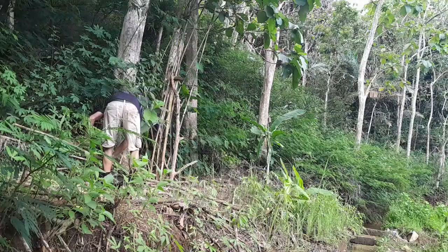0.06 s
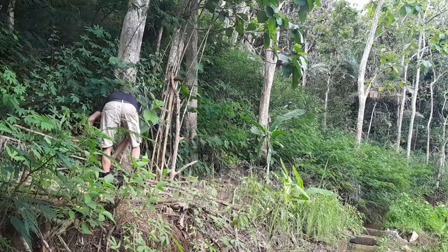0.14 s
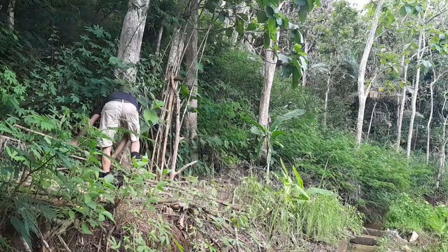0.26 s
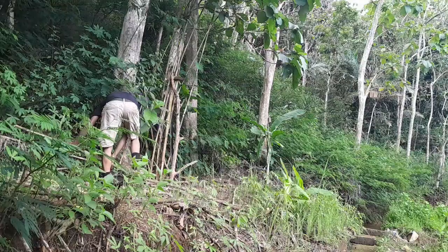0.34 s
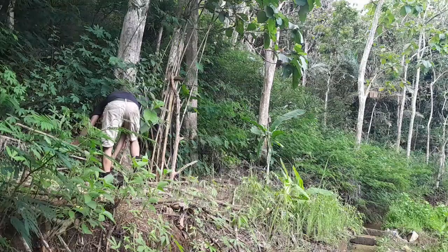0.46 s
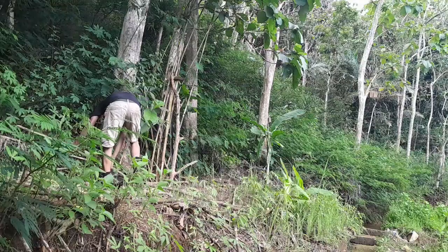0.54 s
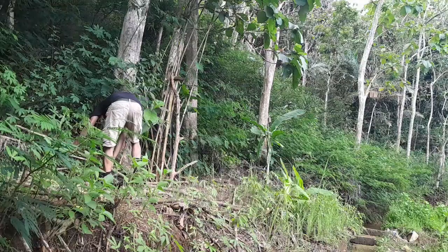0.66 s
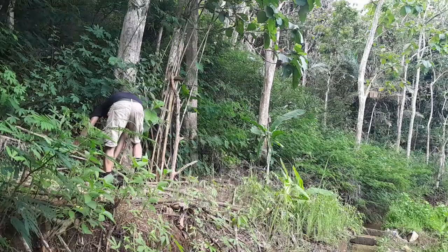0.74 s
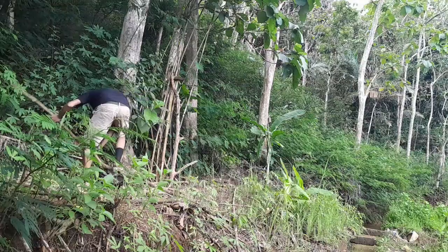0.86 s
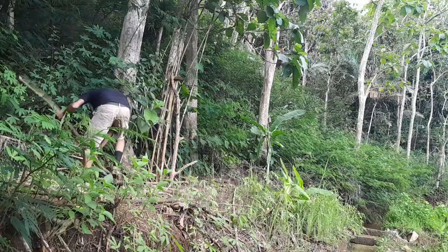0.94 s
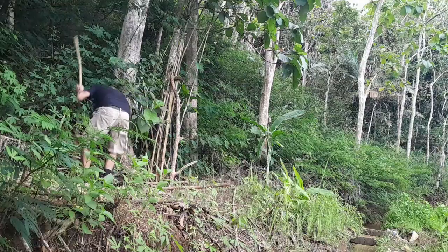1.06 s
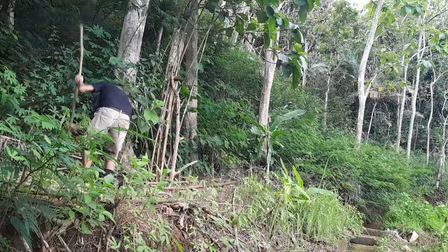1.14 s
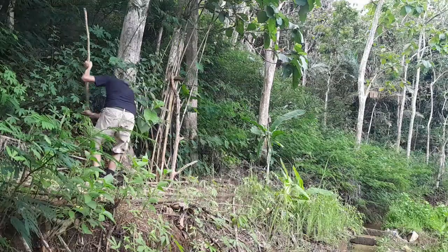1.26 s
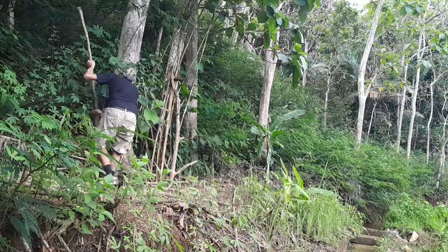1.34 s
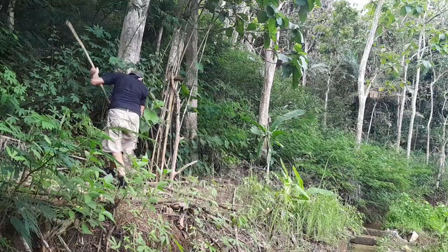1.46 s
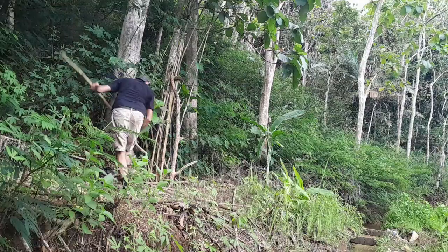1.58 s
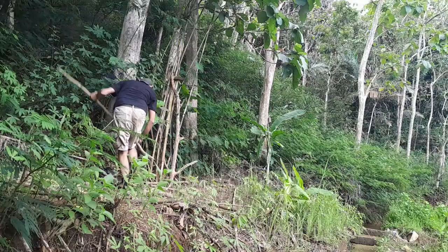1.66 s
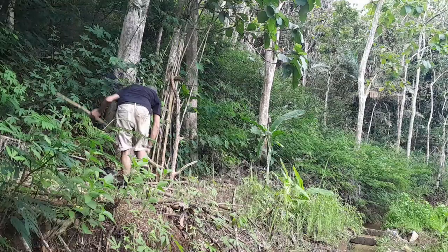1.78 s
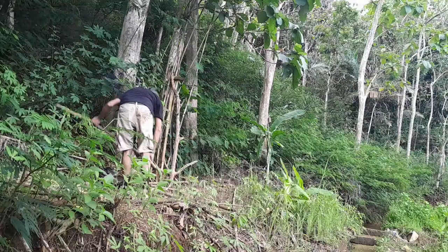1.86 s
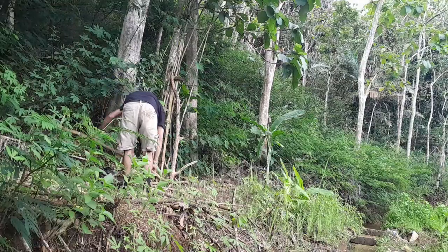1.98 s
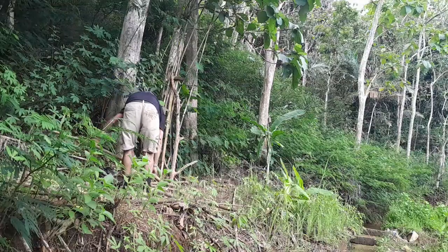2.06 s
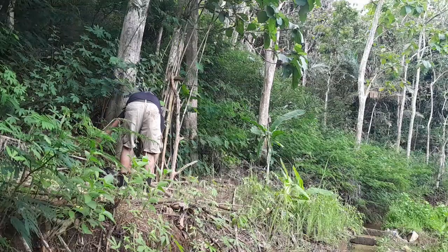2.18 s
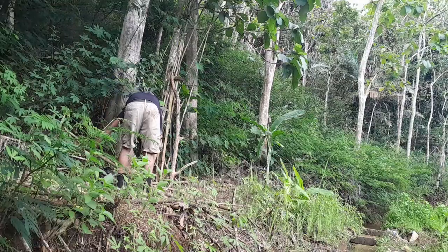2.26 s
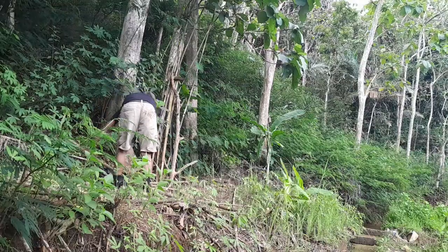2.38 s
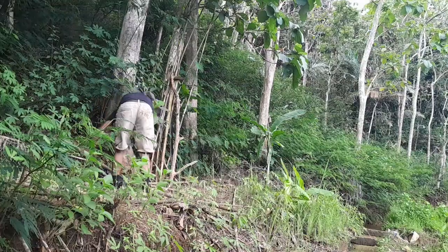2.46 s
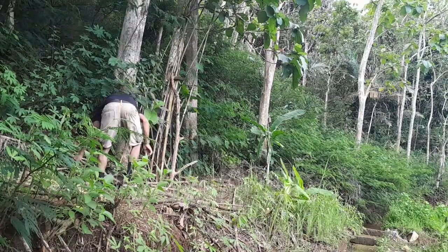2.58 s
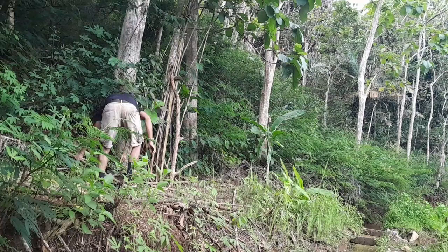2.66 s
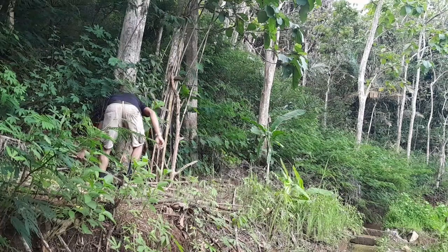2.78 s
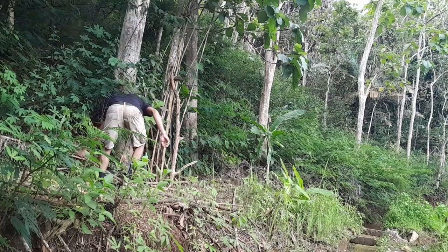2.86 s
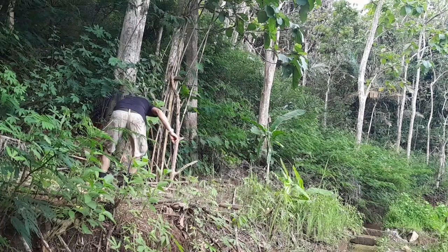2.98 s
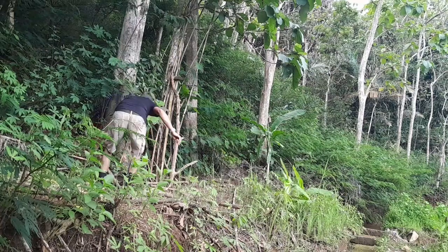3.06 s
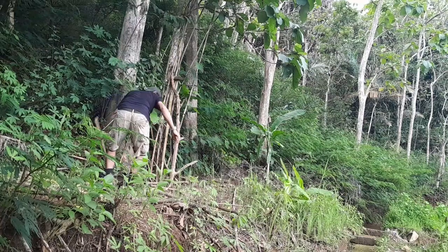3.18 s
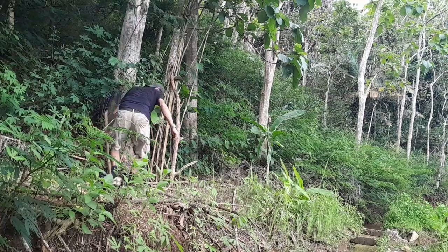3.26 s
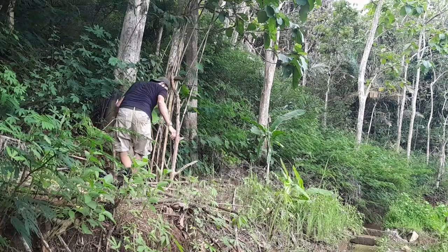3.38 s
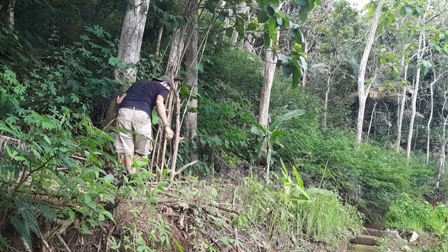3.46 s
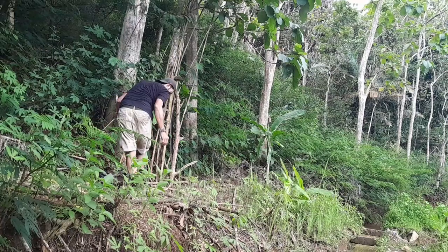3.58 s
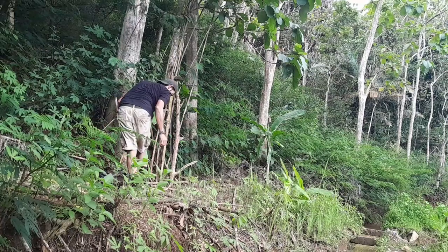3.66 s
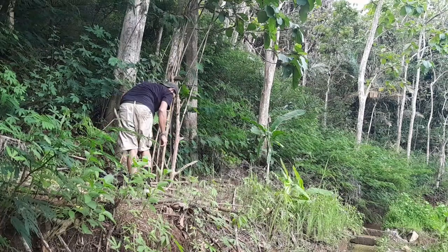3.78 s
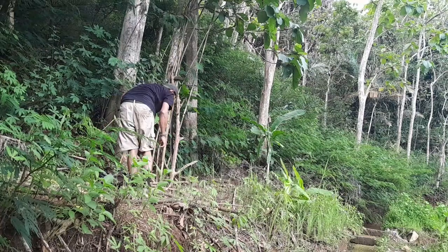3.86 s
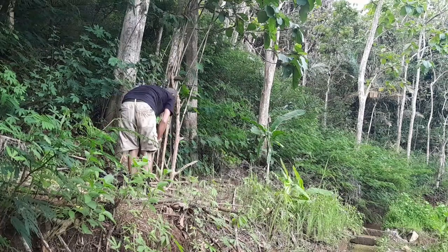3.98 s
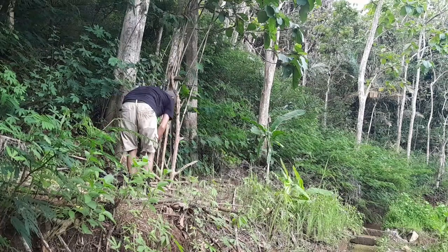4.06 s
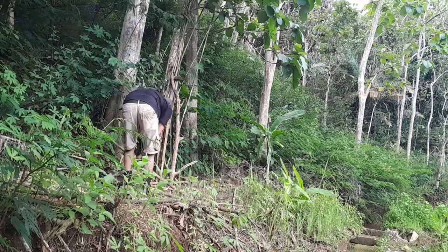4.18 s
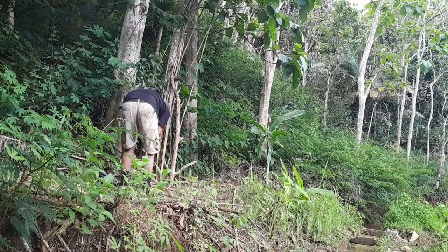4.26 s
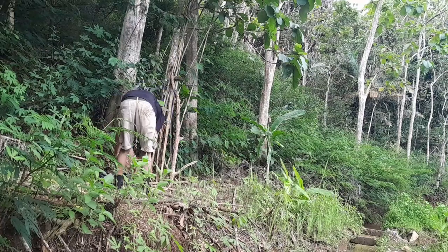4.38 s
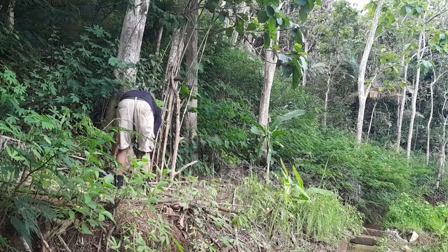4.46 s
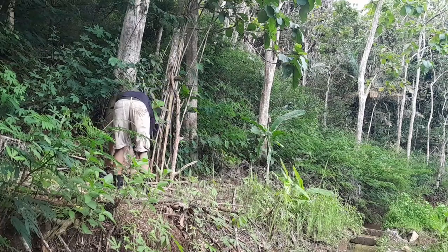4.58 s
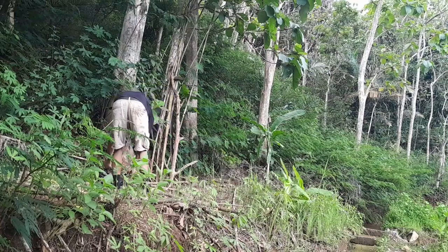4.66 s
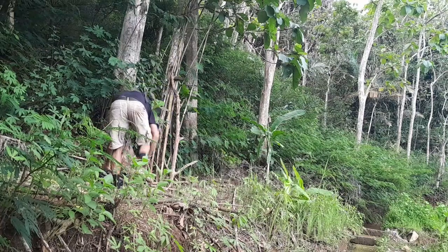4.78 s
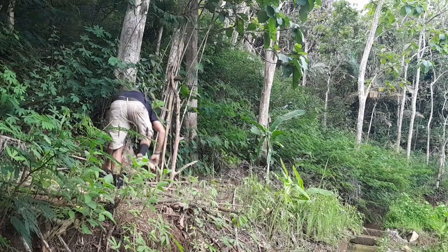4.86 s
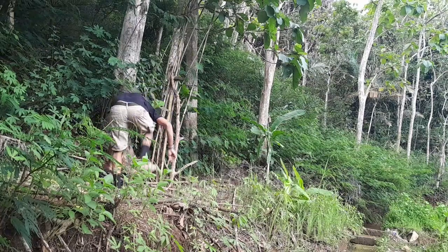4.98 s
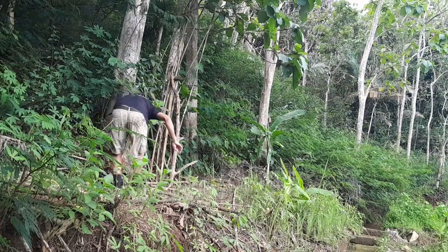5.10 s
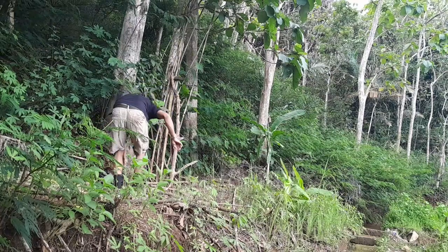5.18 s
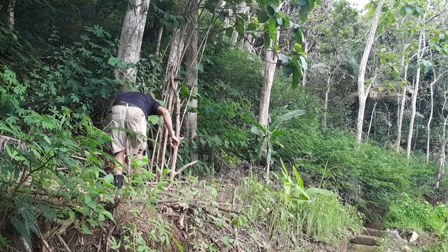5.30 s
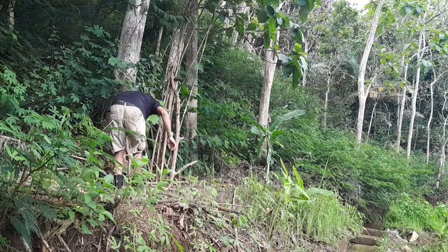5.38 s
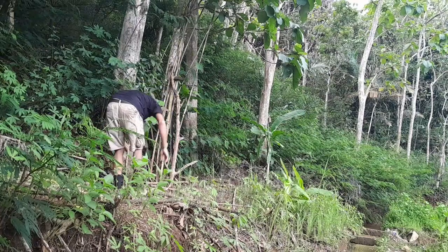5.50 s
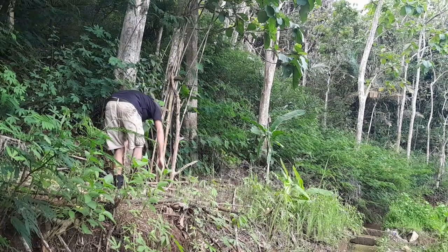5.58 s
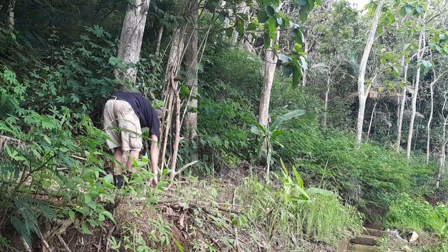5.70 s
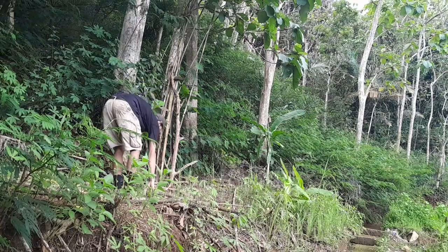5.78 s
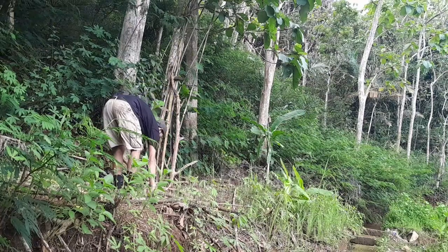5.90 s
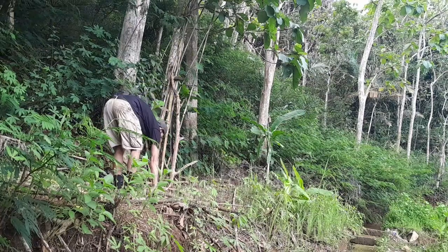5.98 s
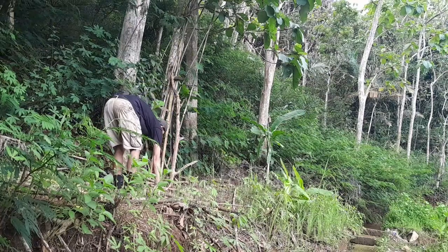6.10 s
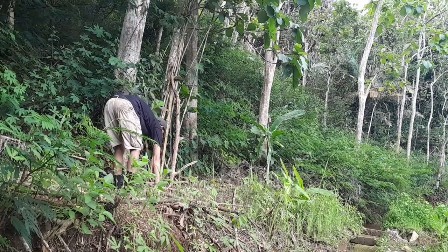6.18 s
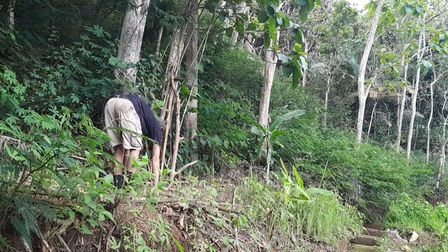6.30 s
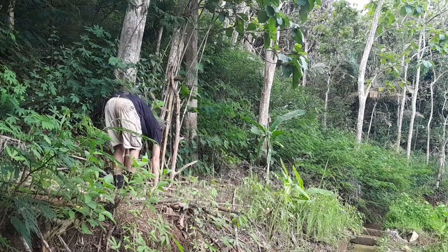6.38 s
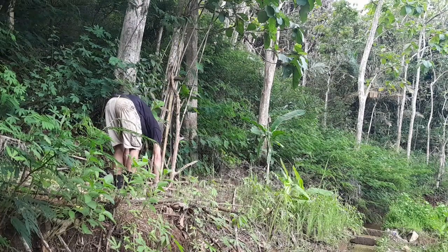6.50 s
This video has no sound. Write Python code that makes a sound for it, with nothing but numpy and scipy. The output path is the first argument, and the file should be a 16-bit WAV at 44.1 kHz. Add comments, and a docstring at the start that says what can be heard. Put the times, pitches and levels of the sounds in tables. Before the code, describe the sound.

Against a faint forest hiss and a low rumble of breeze on the microphone, a dry branch breaks with a sharp crack a few metres away. Two more follow at even intervals, each with a soft thud and a quick wash of echo. Small wooden knocks and a leaf scuff fill the gaps. A very faint insect and a distant whistling bird are heard early on.

```python
"""Snapping dry branches

Three branches are snapped by hand on a wooded slope, a few metres away. Each gives way in two
quick breaks; trunks and leaves scatter the crack into a bright, fading wash. Sticks knock, two
branches crack just before they snap, and dry leaves scuff once. An insect chirps, a far bird
whistles and a light breeze rumbles on the microphone."""
import sys
import numpy as np
from scipy import signal
from scipy.fft import rfft, irfft, next_fast_len
from scipy.io import wavfile

SR = 44100
rng = np.random.default_rng(int(sys.argv[2]) if len(sys.argv) > 2 else 0)


def wrap_up_sound(samples):
    """Save the sound to the file named by the first command line argument, as 16-bit audio."""
    columns = np.atleast_2d(samples).T
    # keep every value between -1 and 1, then stretch to whole-number steps
    tamed = np.clip(columns, -1, 1)
    steps = np.round(tamed * 32767).astype(np.int16)
    wavfile.write(sys.argv[1], SR, steps)


N = 288320

# rumble spectrum of ground and breeze: f/Hz, level/dB
RUMBLE_SPECTRUM = [(15, -33), (25, -44.5), (43, -5), (65, -2), (93, -5), (141, -2), (239, -6.5),
                   (316, -10.5), (406, -14), (700, -18.5), (910, -39), (1540, -120)]


def snaps(thud_t60_s=0.14, rumble_re_thud_db=-18.5, rumble_t60_s=0.7):
    """Per branch: two breaks, stub knock, ground thud and rumble, forest echo, ringing piece."""
    # t/s, first break/dB, delay to second/s, second break/dB, splinters/Hz, thud/dB,
    # stub/Hz, stub/dB, echo/dB, echo low edge/Hz, echo treble/dB, ring/dB
    branches = [(0.9572, 3, 0.0012, -3, 5600, -24, 1174, -20, -19, 1170, -3.5, -33),
                (2.9795, 4, 0.001583, 3.5, 4220, -25.5, 1136, -15, -17.5, 1910, -2, -48),
                (5.0936, 2, 0.00214, -3.5, 3260, -21.5, 1440, -16, -20, 2850, 0, -55)]
    # ground thud: f/Hz, level/dB
    thud_spectrum = [(30, -23), (80, -2), (170, 3.5), (260, -4), (550, -1), (1200, -1), (2500, -16.5),
                     (6000, -18), (16000, -22)]
    out, t = np.zeros((2, N)), np.arange(SR) / SR
    for (s, first_db, delay_s, second_db, splinter_hz, thud_db,
         stub_hz, stub_db, echo_db, low_hz, treble_db, ring_db) in branches:
        add(out, s, from_db(first_db) * fracture(splinter_hz))
        add(out, s + delay_s, from_db(second_db) * fracture(splinter_hz))
        add(out, s + delay_s, from_db(stub_db) * stub_knock(stub_hz))
        add(out, s, diffuse(thud_spectrum, SR) * decay(t, thud_t60_s, thud_db))
        add(out, s, diffuse(RUMBLE_SPECTRUM, SR) * decay(t, rumble_t60_s, thud_db + rumble_re_thud_db))
        add(out, s, from_db(echo_db) * forest_echo(low_hz, treble_db))
        add(out, s, from_db(ring_db) * stick_ring())
    return out


def fracture(splinter_hz, pulse_db=6.5, travel_1khz_s=0.00065, half_width_oct=0.43):
    """One break: a pressure pulse, brief splintering and the last fibres tearing."""
    # breaking wood: f/Hz, level/dB
    crack_spectrum = [(30, -25), (80, -14), (170, 6), (350, -12), (1200, -1), (3000, 2), (5000, 1),
                      (7000, -10), (9800, -13), (12500, -1.5), (16000, -11)]
    size = SR // 8
    t = np.arange(size) / SR
    khz = np.arange(size // 2 + 1) * SR / size / 1000
    # bending waves travel faster the higher they are
    bending = irfft(np.exp(-4j * np.pi * travel_1khz_s * 1e3 * np.sqrt(khz)), size)
    pulse = from_db(pulse_db) * colour(bending, crack_spectrum)
    splinters = rms_one(colour(rng.standard_normal(size), resonance(splinter_hz, half_width_oct)))
    splinters *= decay(t, t60_s=0.012, db=-10)
    tearing = diffuse(crack_spectrum, size) * decay(t, t60_s=0.02, db=-18)
    return from_branch(pulse + splinters) + tearing


def stub_knock(hz, t60_s=0.017, overtone_db=-7):
    """The hand-held stub knocks in its first two bending modes, quickly damped."""
    t = np.arange(SR // 8) / SR
    first = np.sin(2 * np.pi * hz * t) * decay(t, t60_s)
    second = np.sin(2 * np.pi * 2.76 * hz * t) * decay(t, t60_s / 2, overtone_db)
    return from_branch(first + second)


def forest_echo(low_hz, treble_db, build_s=0.0078, shelf_db=-8, grain_db=1.0, grain_s=0.0033):
    """Scatter from trunks and leaves builds as the crack spreads, then dies, treble first."""
    # scattered crack: f/Hz, level/dB
    echo_spectrum = [(100, -11), (500, -4.5), (1000, -1.5), (1700, -1.5), (2700, -0.5), (3600, 1),
                     (5000, 0), (7000, -3.5), (8300, -7), (9800, -14.5), (11500, -5), (14000, -9),
                     (16000, -20)]
    # forest decay: f/Hz, t60/s
    forest_t60 = [(100, 0.76), (700, 0.65), (2000, 0.57), (4000, 0.52), (8000, 0.49), (16000, 0.39)]
    t, hz = np.arange(SR) / SR, np.arange(SR // 2 + 1)
    centres_hz = np.geomspace(250, 16000, 5)
    # a thinner branch radiates a higher range
    girth = [(low_hz * 0.6, shelf_db), (low_hz, 0), (low_hz * 4, 0), (low_hz * 10, treble_db)]
    wash = rfft(diffuse(echo_spectrum, SR)) * from_db(at_hz(girth, hz))
    out = 0
    for centre_hz, share in zip(centres_hz, np.eye(len(centres_hz))):
        band = irfft(wash * at_hz(np.column_stack([centres_hz, share]), hz), SR)
        out += band * decay(t, at_hz(forest_t60, centre_hz))
    trunks = wander(t, grain_s, rng.standard_normal(SR))  # some reflections stand out
    return out * (1 - np.exp(-t / build_s)) * from_db(grain_db * trunks)


def stick_ring(build_s=0.0061, flutter_s=0.037, flutter_depth=0.23):
    """Bending modes of the freed piece flutter as their paths through the trees mix."""
    # f/Hz, level/dB, t60/s
    modes = [(759, -9, .2), (1082, -2, .6), (1335, -5, .42), (1722, 0, .47), (1851, -6, .35),
             (2114, -7, .35), (2410, -5, .42), (2745, -4, .35)]
    out, t = 0, np.arange(SR) / SR
    for hz, db, t60_s in modes:
        paths = rng.standard_normal((2, 200)) + 1j * rng.standard_normal((2, 200))
        flutter = np.array([wander(t, flutter_s, port) for port in paths])
        tone = np.exp(2j * np.pi * (hz * t + rng.random())) * (1 + flutter_depth * flutter)
        out += tone.real * decay(t, t60_s, db)
    return out * (1 - np.exp(-t / build_s))


def knocks_cracks_scuff(tick_ratio=3.1, overtone_db=-17, soil_ratio=0.45, soil_lag_s=0.0027):
    """Sticks knock with a brief high tick of bark and leaves, two branches crack just before they snap, and dry
    leaves scuff once."""
    # t/s, level/dB, f/Hz, half-width/oct, t60/s; cracks at 0.953 and 5.0667 s, scuff at 5.738 s
    events = [(0.674, -44, 3026, 0.38, .03), (0.953, -28, 5200, 1.0, 0.0063),
              (1.4242, -24.5, 1040, 0.55, 0.032), (1.605, -42, 760, 0.41, .02),
              (1.802, -33.5, 1490, 0.33, 0.023), (3.239, -40.5, 600, 0.51, 0.061),
              (3.443, -46, 800, .6, .09), (4.757, -47, 1980, 0.22, .08), (5.0667, -20.5, 674, 1.12, 0.0093),
              (5.738, -46, 3000, 1.7, 0.12), (6.275, -41.5, 770, 0.69, 0.035),
              (6.388, -34.5, 1290, 1.1, 0.021)]
    out = np.zeros((2, N))
    for s, db, hz, half_width_oct, t60_s in events:
        soil_db = db + 1.05 * (db + 18.5)  # hard ones also thud in the soil
        add(out, s, from_db(db) * contact(hz, half_width_oct, t60_s))
        add(out, s, from_db(db + overtone_db) * contact(hz * tick_ratio, half_width_oct, t60_s=0.13))
        add(out, s + soil_lag_s, from_db(soil_db) * contact(hz * soil_ratio, half_width_oct, t60_s=0.096))
    return out


def contact(hz, half_width_oct, t60_s, tap_db=-5, rattle_db=-8, echo_db=-23, echo_t60_s=0.41):
    """A tap and a short rattle excite a damped resonance and leave a faint echo."""
    t = np.arange(SR // 4) / SR
    impulse = 1.0 * (t == 0)
    response = colour(impulse, resonance(hz, half_width_oct))
    envelope = decay(t, t60_s, rattle_db) + decay(t, echo_t60_s, echo_db)
    rattle = envelope * diffuse([(hz, 0)], len(t))  # flat spectrum
    body = signal.fftconvolve(rattle, response[None] / np.linalg.norm(response), axes=1)
    tap = from_db(tap_db) * from_branch(response / np.abs(response).max())
    return body[:, :len(t)] + tap


def bird(note_s=0.094, fall_hz_per_s=3070, waver_hz=50, waver_s=0.0027, echo_t60_s=0.81, wet=0.92):
    """Far, falling, slightly hoarse whistles, smeared by the trees."""
    # t/s, start f/Hz, level/dB
    notes = [(0.87, 2700, -66), (1.298, 2510, -55.5), (2.355, 2685, -60.5), (2.515, 2510, -60.5),
             (2.70, 2510, -56.5), (2.875, 2490, -58.5)]
    out, t = np.zeros((2, N)), np.arange(SR // 2) / SR
    for s, start_hz, db in notes:
        waver = wander(t, waver_s, rng.standard_normal(len(t)))
        hz = (start_hz - fall_hz_per_s * t + waver_hz * waver)[t < note_s]
        whistle = np.sin(2 * np.pi * np.cumsum(hz) / SR)
        note = from_db(db) * rms_one(whistle * np.hanning(len(hz)))
        trees = rng.standard_normal((2, len(t))) * decay(t, echo_t60_s)
        add(out, s, note / 2)
        add(out, s, wet * signal.fftconvolve(note[None], trees / np.linalg.norm(trees), axes=1))
    return out


def insect(hz=6930, half_width_oct=0.047, db=-63, half_length_s=0.022):
    """A bush cricket rasps on one narrow wing resonance, in runs of even chirps."""
    # start/s, end/s, period/s
    runs = [(0.037, 0.92, 0.1), (0.935, 2.5, .1075), (2.597, 3.3, 0.103)]
    t = np.arange(N) / SR
    chirps_s = np.concatenate([np.arange(*run) for run in runs])
    envelope = sum(np.exp(-np.minimum(((t - s) / half_length_s) ** 4, 20)) for s in chirps_s)
    return from_db(db) * envelope * diffuse(resonance(hz, half_width_oct), N)


def breeze(rumble_gain_db=2.5):
    """Wind rumbles on the microphone; a few gusts buffet it."""
    # rumble before gain: t/s, level/dB
    rumble_levels = [(0, -56.5), (0.6, -59), (1.3, -55.5), (2.0, -59), (2.4, -52), (3.65, -59),
                     (4.05, -55.5), (5.4, -55.5), (6.54, -58.5)]
    # t/s, half-length/s, peak/dB
    gusts = [(2.224, 0.064, -46), (2.32, .1, -49), (4.488, 0.017, -48), (4.97, 0.027, -41.5),
             (5.746, 0.023, -48.5)]
    # buffeting: f/Hz, level/dB
    gust_spectrum = [(20, -24), (45, 8), (110, 7), (200, 3.5), (400, -19), (1500, -42)]
    t = np.arange(N) / SR
    rumble = from_db(in_time(rumble_levels) + rumble_gain_db) * diffuse(RUMBLE_SPECTRUM, N)
    gust_envelope = sum(from_db(db) / (1 + ((t - s) / half_s) ** 2) for s, half_s, db in gusts)
    return rumble + gust_envelope * diffuse(gust_spectrum, N)


def forest_air():
    """Hiss of distant leaves and insects."""
    # t/s, level/dB
    hiss_levels = [(0, -56.5), (2.9, -56.5), (3.7, -59.5), (4.9, -56.5), (6.0, -59), (6.54, -58)]
    # f/Hz, level/dB
    hiss_spectrum = [(240, -30), (400, -9), (489, -8.5), (536, -13), (801, -9.5), (865, -11), (1960, -13.5),
                     (2630, -16.5), (2970, -15.5), (6540, -20), (7170, -16.5), (8110, -26), (15000, -30.5),
                     (16000, -40)]
    return from_db(in_time(hiss_levels)) * diffuse(hiss_spectrum, N)


def litter(db=-62, spread_db=3, hz=2300, half_width_oct=0.79, t60_s=0.21, count=50):
    """Dry leaves and twigs rustle faintly under hands and feet."""
    out, t = np.zeros((2, N)), np.arange(SR // 10) / SR
    for when, strength, shift_oct in rng.uniform(-1, 1, (count, 3)):
        s = (when + 1) / 2 * N / SR
        rustle = diffuse(resonance(hz * 2 ** shift_oct, half_width_oct), len(t))
        add(out, s, rustle * decay(t, t60_s, db + spread_db * strength))
    return out


def from_branch(x, lag_s=0.00012):
    """Direct sound reaches the left microphone port just after the right."""
    t = np.arange(len(x)) / SR
    return np.array([np.interp(t - lag_s, t, x, left=0), x])


def diffuse(spectrum, size):
    """Stereo noise from all around, rms 1: alike at both ports in the bass, unrelated in the treble."""
    # f/Hz, left-right likeness
    port_likeness = [(60, 1.02), (250, 0.82), (500, 0.5), (1000, -0.25), (2000, 0.04), (4000, 0),
                     (16000, 0)]
    # f/Hz, left minus right/dB
    port_balance = [(500, 0), (2000, -0.5), (4000, 1), (8000, 0), (16000, -7)]
    hz = np.arange(size // 2 + 1) * SR / size
    mid, side = rfft(rng.standard_normal((2, size)))
    alike = np.clip(at_hz(port_likeness, hz), -1, 1)
    sign = np.array([[1], [-1]])
    ports = np.sqrt(1 + alike) * mid + np.sqrt(1 - alike) * side * sign
    ports *= from_db(sign * at_hz(port_balance, hz) / 2)
    return rms_one(irfft(ports * from_db(at_hz(spectrum, hz)), size))


def resonance(hz, half_width_oct):
    """One peak with steep skirts: f/Hz, level/dB."""
    steps = np.arange(-12, 13)
    return np.column_stack([hz * 2 ** (steps * half_width_oct), -20 * np.log10(1 + np.abs(steps) ** 3)])


def colour(x, spectrum):
    """Minimum-phase filter with the given spectrum."""
    n = 2 * next_fast_len(len(x))
    hz = np.arange(n // 2 + 1) * SR / n
    cepstrum = irfft(np.log(from_db(at_hz(spectrum, hz))))
    cepstrum[1:n // 2] *= 2
    response = np.exp(rfft(cepstrum[:n // 2], n))
    return irfft(rfft(x, n) * response)[:len(x)]


def from_db(db):
    """Decibels to gain."""
    return 10 ** (np.asarray(db) / 20)


def decay(t, t60_s, db=0):
    """Exponential fade from a starting level."""
    return from_db(db - 60 * t / t60_s)


def rms_one(x):
    """Scale to rms 1."""
    return x / np.sqrt(np.mean(x ** 2) + 1e-20)


def wander(t, step_s, values):
    """Glide through evenly spaced values."""
    return np.interp(t / step_s, np.arange(len(values)), values)


def at_hz(table, hz):
    """Read a table on a log-frequency axis."""
    table_hz, values = np.transpose(table)
    return np.interp(np.log(np.maximum(hz, 1)), np.log(table_hz), values)


def in_time(table):
    """Read a curve at every sample."""
    return np.interp(np.arange(N) / SR, *np.transpose(table))


def add(out, s, sound):
    """Mix a sound in at time s."""
    i = max(0, round(s * SR))
    out[:, i:i + sound.shape[-1]] += sound[..., :N - i]


def scene():
    """Everything on the slope, in stereo."""
    return snaps() + knocks_cracks_scuff() + bird() + insect() + breeze() + forest_air() + litter()


def record(dry, low_cut_hz=38, ceiling=0.92, high_cut_hz=16100):
    """Low cut, soft clipping, steep high cut."""
    highpass = signal.butter(4, low_cut_hz, "high", fs=SR, output="sos")
    lowpass = signal.ellip(10, 0.05, 60, high_cut_hz, fs=SR, output="sos")
    rounded = ceiling * np.tanh(signal.sosfilt(highpass, dry) / ceiling)
    return signal.sosfiltfilt(lowpass, rounded)


dry = scene()
out = record(dry)
wrap_up_sound(out)
```